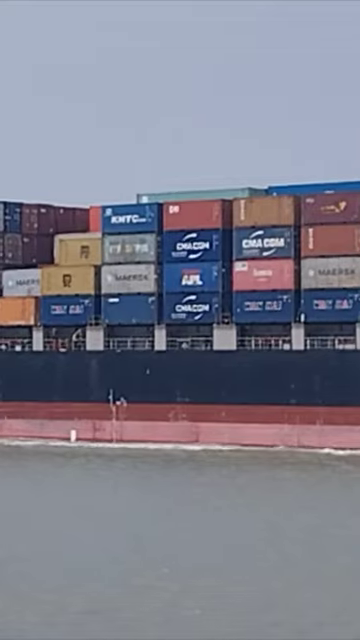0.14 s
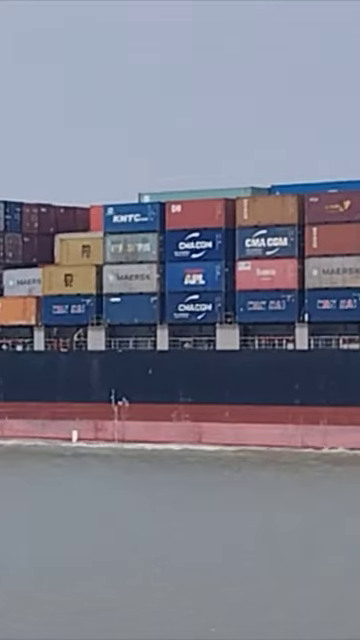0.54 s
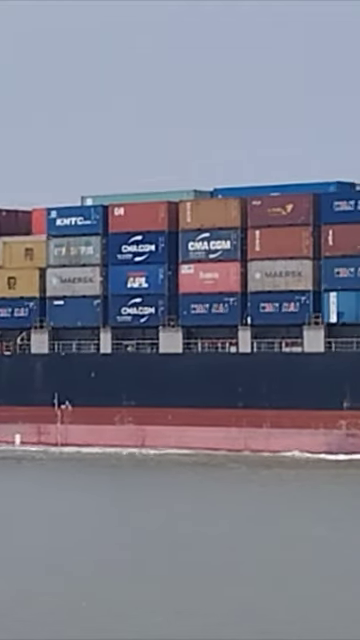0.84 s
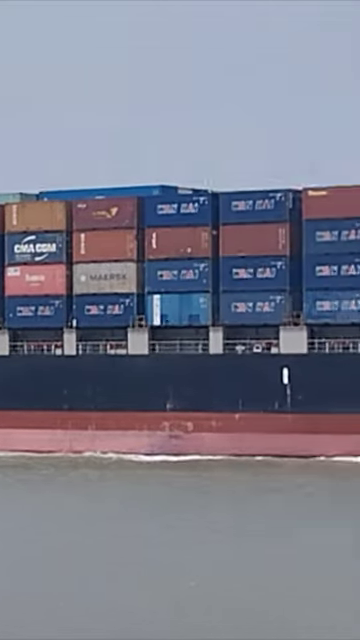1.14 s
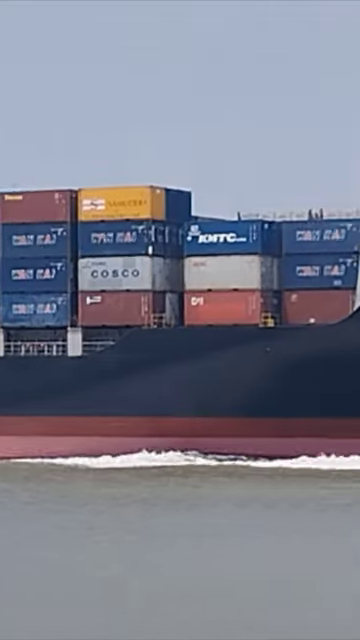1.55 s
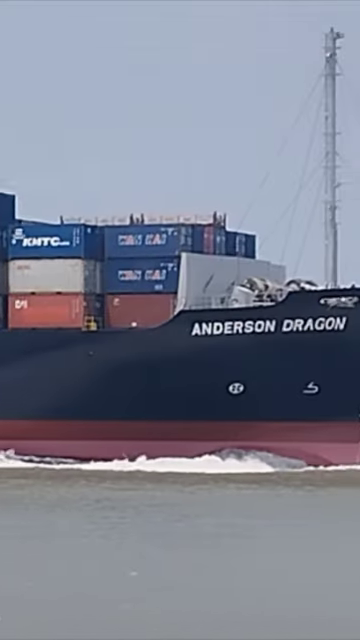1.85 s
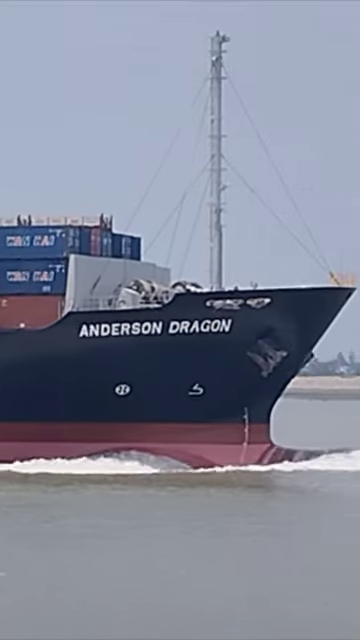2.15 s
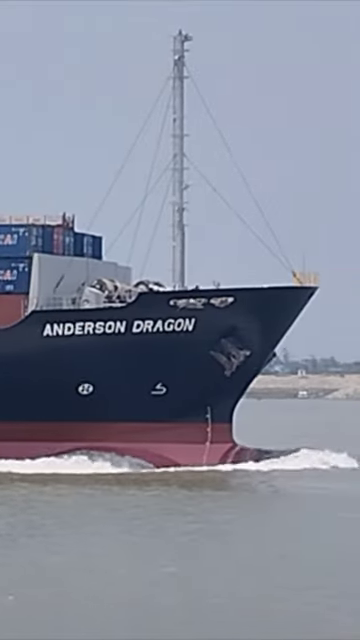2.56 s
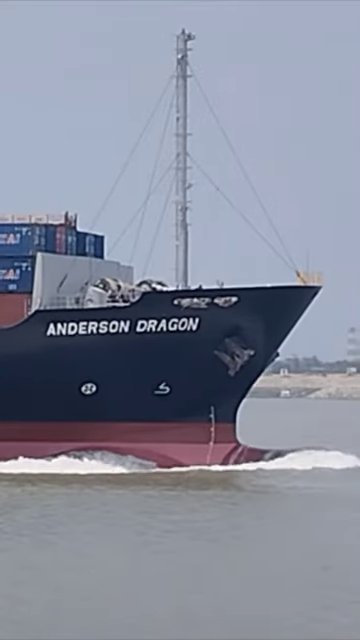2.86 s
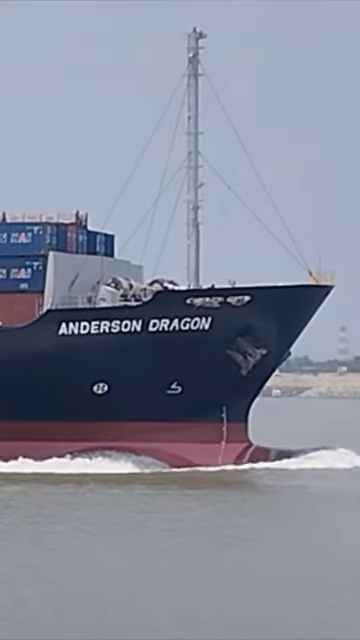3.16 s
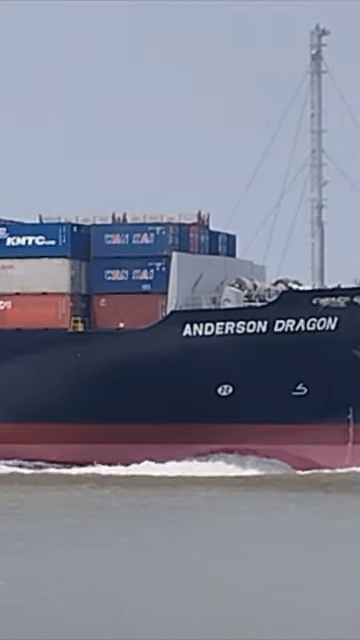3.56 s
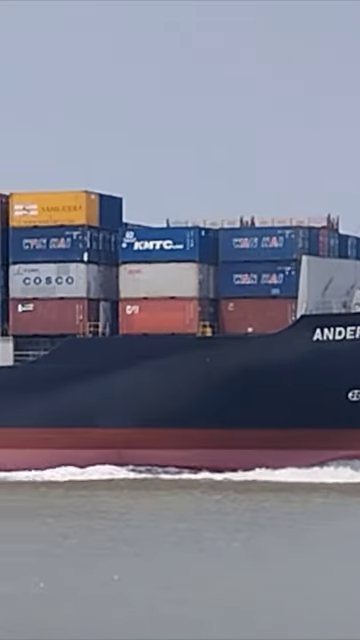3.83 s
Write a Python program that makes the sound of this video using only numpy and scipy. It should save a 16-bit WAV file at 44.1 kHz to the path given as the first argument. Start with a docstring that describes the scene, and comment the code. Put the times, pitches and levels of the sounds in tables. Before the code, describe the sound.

A cargo ship's air horn, loud, low and brassy, enters abruptly at about 0.7 seconds and holds one steady pitch until the cut at about 4 seconds, its upper tones shimmering and fading, with rough buzz and rushing air. Before it, after a tiny silence, a quieter fast diesel throb, wavering hum and water wash. Soft wind gusts buffet the handheld stereo microphones throughout.

```python
"""A diesel throb, a wavering hum, the wash of water and gusts on the two microphone ports come first:
a windy deck with a hand-held camera. Then a cargo ship sounds its air horn across open water.
The horn is a steady stack of partials that swell and fade as the air paths drift, with a rush of air.
Exhaust tones and hum are sinusoids; wash, wind and rush are shaped noise."""
import sys
import numpy as np
from scipy import signal
from scipy.io import wavfile
from scipy.ndimage import uniform_filter1d, minimum_filter1d

SR = 44100
rng = np.random.default_rng(int(sys.argv[2]) if len(sys.argv) > 2 else 0)


def wav_out(sig):
    """Save sig, one row per channel (or a flat mono array), as 16-bit PCM at SR to the path in sys.argv[1]."""
    wavfile.write(sys.argv[1], SR, np.round(np.clip(np.atleast_2d(sig).T, -1, 1) * 32767).astype(np.int16))


def decibels_to_gain(level_db):
    """Convert a level in decibels to a linear amplitude gain (20 dB per decade)."""
    exponent = np.asarray(level_db, float) / 20
    return 10 ** exponent


N = 176400

HORN_START_S, HORN_RISE_S = .702, .016
FILL_S = .8  # time in which the scattered sound builds up after the horn starts
PITCH_HZ = 194.36
CONTROL_STEP = 100  # samples between points of the slow horn controls
SIDE = np.array([[.5], [-.5]])  # shares a left-right difference between the ports

# balance of the horn between the two ports: f/Hz, left minus right/dB
HORN_BALANCE = [(190, -1.5), (390, 1.2), (600, -.5), (1000, -1.5), (1500, -3), (2500, -7), (4000, -7),
                (7000, -5), (9000, -2)]


def evened(x):
    """Scales a signal to an rms of one."""
    return x / np.sqrt(np.mean(abs(x) ** 2) + 1e-20)


def read(points, hz):
    """Reads a curve of (frequency, value) points along a logarithmic frequency axis."""
    f, value = np.transpose(points)
    return np.interp(np.log(hz + 1), np.log(f + 1), value)


def slow(rate_hz, t, channels):
    """Slow complex chance, rms 1: twelve random-phase rotations, rate_hz being the spread of their speeds."""
    f = rate_hz * rng.standard_normal((channels, 12, 1))
    start_turns = rng.random((channels, 12, 1))
    return np.exp(2j * np.pi * (f * t + start_turns)).sum(1) / np.sqrt(12)


def noise(shape, same, pan, patchy_db, lift_db, size):
    """Stereo noise from random short-time spectra with drifting patches; lift_db moves the level in time."""
    hop = size // 4
    frames, hz = N // hop + 5, np.fft.rfftfreq(size, 1 / SR)
    a, b, c, d, patches = rng.standard_normal((frames, len(hz), 5)).T
    patches = uniform_filter1d(patches, size=16, axis=0)  # across frequency
    patches = evened(uniform_filter1d(patches, size=10, axis=1))  # along time
    same = np.clip(read(same, hz), -1, 1)[:, None]
    left = a + 1j * b
    right = same * left + np.sqrt(1 - same ** 2) * (c + 1j * d)
    balance_db = np.outer([.5, -.5], read(pan, hz))[:, :, None]
    spectra = np.array([left, right]) * decibels_to_gain(read(shape, hz)[:, None] + patchy_db * patches + balance_db)
    sound = signal.istft(spectra, nperseg=size, noverlap=size - hop)[1][:, :N]
    return evened(sound) * decibels_to_gain(lift_db)


def engine(t):
    """Exhaust tones on the firing rate, a wavering hum, and a water and engine roar lifted by each firing."""
    # exhaust tones: multiple of the firing rate, level/dB rms
    exhaust = [(2, -54.5), (4, -44), (5, -52), (6, -52.5), (7, -39), (8, -55.5), (9, -43.5), (10, -51.5),
               (11, -46.5), (13, -47)]
    # water and distant engine roar: f/Hz, relative level per Hz/dB
    wash_shape = [(12, -49), (20, -13.5), (48, -12), (139, -19), (197, -19), (293, -25.5), (426, -30),
                  (735, -32.5), (943, -40.5), (2040, -44), (7610, -67), (9890, -103), (16700, -120)]
    # likeness of the roar in the two ports: f/Hz, likeness/0-1
    wash_same = [(60, 0.73), (120, 0.96), (240, 1), (470, 0.93), (920, 0.31), (1830, 0.11), (3620, 0.63),
                 (7160, 0.59)]
    # balance of the roar: f/Hz, left minus right/dB
    wash_balance = [(60, 4), (160, 5), (410, -0.5), (1060, 1), (2750, -4), (7160, -11)]
    firing_hz, wash_db = 10, -30
    hum_hz, hum_db, hum_waver_db = 43.6, -30.5, -2
    chuff_db, chuff_sharp, chuff_turn = 2, 9, 0.18  # lift, narrowness and place within one firing turn

    turns = firing_hz * t + 0.0088 * slow(0.63, t, channels=1).real[0]
    tones = sum(decibels_to_gain(db) * np.cos(2 * np.pi * (k * turns + rng.random())) for k, db in exhaust)
    waver = slow(1.8, t, channels=1)[0]
    hum = decibels_to_gain(hum_db + hum_waver_db * waver.real) * np.cos(2 * np.pi * hum_hz * t + .4 * waver.imag)
    lift_db = chuff_db * np.exp(chuff_sharp * (np.cos(2 * np.pi * (turns - chuff_turn)) - 1))
    roar = noise(wash_shape, wash_same, wash_balance, patchy_db=1.5, lift_db=wash_db + lift_db, size=2048)
    return np.sqrt(2) * (tones + hum) + roar


def wind(t):
    """Lumpy low pressure, drawn separately for the two ports, rising in gusts."""
    # wind at the ports: f/Hz, relative level per Hz/dB
    wind_shape = [(15, 4), (30, 0.5), (50, 8), (100, 3.5), (160, 10.5), (250, -0.5), (400, -23), (800, -48)]
    # gusts: t/s, length/s, level over the breeze/dB, left minus right/dB
    gusts = [(.6, .03, 6, 2), (.85, .08, 5, 3), (1.3, .05, 7, 8), (1.48, .06, 9, 8), (1.68, .05, 6, 4),
             (2.15, .06, 4, 6), (2.5, .07, 9, 2), (2.98, .05, 11, -8), (3.28, .05, 6, -4),
             (3.85, .06, 3, 0)]
    breeze_db = -38
    flat_zero = [(20, 0), (800, 0)]  # neither likeness nor imbalance at any frequency

    lift_db = breeze_db + 2.5 * slow(8, t, channels=2).real
    for s, length, db, balance_db in gusts:
        lift_db = lift_db + (db + SIDE * balance_db) * np.exp(-.5 * ((t - s) / length) ** 2)
    return noise(wind_shape, flat_zero, flat_zero, patchy_db=3, lift_db=lift_db, size=2048)


def scatter_fill(t):
    """Scattered sound builds up exponentially, 0 to 1, once the horn has started."""
    return 1 - np.exp(-np.maximum(t - HORN_START_S, 0) / FILL_S)


def partial_levels(k, t):
    """Source level of partial k, and the lift or dip in dB where its air paths add and cancel."""
    # horn: t/s, level of partials one to five/dB rms (five columns), offset of the upper partials
    # at the low and at the high end of the lean/dB (two columns), offset of the half-pitch partials/dB
    horn_course = [(0.729, -17, -14, -14.5, -22, -35.5, -35, -33.5, -16),
                   (0.84, -19.5, -11.5, -16, -26, -33, -33, -33, -12),
                   (0.99, -16, -11, -16.5, -22.5, -26, -28, -32.5, -16.5),
                   (1.29, -16.5, -12, -16, -22, -26, -33.5, -32, -15.5),
                   (1.57, -16.5, -10.5, -16.5, -22.5, -25, -29.5, -34.5, -18),
                   (1.949, -14, -12.5, -10, -21.5, -27.5, -28, -31.5, -10),
                   (2.15, -15, -12.5, -10.5, -22, -27, -30.5, -29, -13.5),
                   (2.3, -15, -14.5, -12, -27.5, -31.5, -26.5, -31.5, -10),
                   (2.52, -13, -16.5, -13.5, -27.5, -27.5, -32.5, -27.5, -12.5),
                   (2.54, -14, -13, -13, -41, -25, -26.5, -29.5, -8.5),
                   (2.659, -15.5, -17, -17.5, -27, -23, -32, -29, -13),
                   (2.89, -12.5, -14.5, -20.5, -26, -27.5, -38, -29, -11),
                   (3.251, -15.5, -14, -17.5, -20.5, -24, -33, -31, -12.5),
                   (3.412, -14.5, -15.5, -16, -23, -28.5, -30, -32, -10.5),
                   (3.6, -16.5, -12, -19, -22.5, -29, -33, -30, -9.5),
                   (3.78, -14, -12, -18.5, -32, -29.5, -39, -25, -15.5),
                   (3.97, -16, -11, -16.5, -27.5, -32, -40, -29, -12)]
    # partials six to eight as the air paths add and cancel: t/s, level of each/dB rms (three columns)
    brass_course = [(0.74, -29.5, -35.5, -32), (0.92, -31.5, -32.5, -29.5), (1.09, -37, -31, -30.5),
                    (1.42, -26.5, -32.5, -32.5), (1.64, -43, -33.5, -31.5), (1.79, -30, -44.5, -46),
                    (1.94, -28, -35, -47), (2.08, -25.5, -35, -35), (2.38, -31, -33, -43),
                    (2.53, -27.5, -34.5, -54), (2.76, -41, -35, -49), (2.91, -30, -33.5, -55),
                    (2.95, -29, -33.5, -39), (3.08, -41.5, -34, -42), (3.37, -39, -39.5, -47),
                    (3.55, -56, -41, -46), (3.61, -32, -36, -48), (3.73, -36.5, -46, -49),
                    (3.83, -31.5, -39, -46), (3.97, -34, -40.5, -42)]
    # bright spot wandering over the upper partials: t/s, centre f/Hz, lift/dB
    bright_spot = [(0.729, 2530, 4), (.8, 2460, -6), (1, 1950, 3.5), (1.35, 2004, 10), (1.7, 2200, 7),
                   (2.2, 2360, 9.5), (2.35, 2460, -1.5), (2.5, 2760, -4), (2.8, 2700, 8.5),
                   (3.1, 2600, -0.5), (3.4, 2530, 6.5), (3.7, 2610, 11.5), (3.971, 2690, 2)]
    # upper partials: f/Hz, relative level/dB
    bell = [(1170, 0), (1360, 1), (1560, -1.5), (1750, -13), (1940, -7.5), (2330, -13.5), (2720, -10.5),
            (3300, -20), (4500, -22), (5700, -25.5), (7000, -30.5), (7800, -41.5), (9700, -65)]
    # half-pitch partials: f/Hz, relative level/dB
    half_shape = [(97, -44), (290, -29.5), (490, -30.5), (680, -24.5), (880, -36), (1070, -34), (1260, -30),
                  (2000, -39.5), (3300, -44), (5700, -43.5), (7000, -52.5), (7800, -73), (9700, -93.5)]
    # extra edge of the fresh blast, fading as the scatter fills: f/Hz, lift/dB
    fresh_edge = [(3000, 0), (3900, 3.5), (4800, 4), (7000, 2.5)]
    lean_hz = (1600, 1900)  # as the camera turns, the weight shifts across this span
    bright_width_hz, half_late_db = 98, 8  # the half-pitch partials grow in after the start

    hz = k * PITCH_HZ
    s, *strong, low, high, half = np.transpose(horn_course)
    if k % 1:
        level_db = half + read(half_shape, hz) - half_late_db * np.exp(-(s - HORN_START_S) / FILL_S)
    elif k <= len(strong):
        level_db = strong[int(k) - 1]
    else:
        level_db = low + (high - low) * np.interp(hz, lean_hz, (0, 1)) + read(bell, hz)
    level_db = np.interp(t, s, level_db) + read(fresh_edge, hz) * (1 - scatter_fill(t))

    if k in (6, 7, 8):
        at, *brass = np.transpose(brass_course)
        meet_db = np.interp(t, at, brass[int(k) - 6]) - level_db
    else:
        when, spot_hz, spot_db = np.transpose(bright_spot)
        distance = (hz - np.interp(t, when, spot_hz)) / bright_width_hz
        meet_db = np.interp(t, when, spot_db) * np.exp(-.5 * distance ** 2)
    return level_db, meet_db


def air_path(k, t, meet_db):
    """Partial k at the two ports: a direct wave, a drifting scattered share and a faint blurred echo."""
    # drifting share against the direct path: f/Hz, ratio
    scatter = [(190, .08), (600, 0.14), (1000, 0.65), (1200, .62), (1700, .7), (2000, 1.1), (4000, 1.4)]
    # part of the drift alike in both ports, the rest opposed: f/Hz, share/0-1
    drift_same = [(190, .05), (1000, .05), (1600, .1), (1800, .6), (4000, .6), (5000, .8), (8000, .95)]
    # faint blurred echo: f/Hz, ratio
    echo_ratio = [(190, .02), (600, .02), (1200, .1), (2000, .12), (3500, .13), (8000, .13)]
    # lead of the left port: f/Hz, phase/rad
    port_lead = [(190, -0.069), (390, 0.26), (600, 0.35), (800, 0.026), (1000, -0.86), (8000, -0.82)]
    drift_hz, drift_per_khz = 0.557, .6  # spread of fading speeds/Hz, and its growth per kHz of pitch
    first_share = .5  # the alike drift starts from this part of its full size
    spread_rad, offset_rad = 1.45, -.92  # to the fourth partial, phase grows with its number squared
    step_rad, smear_rad = -.07, .12  # the next stay in step as one pulse; above the tenth they smear
    wander_rad = 1.2  # phase drift for each unit of the drifting share
    echo_sharp, flutter_hz = .0125, 4  # echo this share above the pitch, as from a moving source

    hz, filled = k * PITCH_HZ, scatter_fill(t)
    ratio, same = read(scatter, hz), np.clip(read(drift_same, hz), 0, 1)
    both, opposed = slow(drift_hz + drift_per_khz * hz / 1000, t, channels=2)
    alike = np.maximum(filled, first_share) * ratio * same
    direct = decibels_to_gain(meet_db) * (1 + alike * both)
    apart = 2 * SIDE * ratio * np.sqrt(filled * (1 - same ** 2)) * opposed
    path = (direct + apart) / np.sqrt(1 + alike ** 2)

    chance = rng.standard_normal((2, len(t), 2)) @ [1, 1j]
    pole = np.exp(-2 * np.pi * flutter_hz * CONTROL_STEP / SR)
    flutter = evened(signal.lfilter([1], [1, -pole], chance))
    path = path + filled * read(echo_ratio, hz) * flutter * np.exp(2j * np.pi * echo_sharp * hz * t)

    phase = spread_rad * min(k, 4) ** 2 + offset_rad
    phase = phase + step_rad * max(k - 4, 0) + smear_rad * max(k - 10, 0) ** 2
    phase = phase + wander_rad * filled * ratio * both.imag
    return path * decibels_to_gain(SIDE * read(HORN_BALANCE, hz)) * np.exp(1j * (SIDE * read(port_lead, hz) + phase))


def horn_rush(t, turns):
    """Air rushing through the horn: noise that beats at the pitch and builds up after the start."""
    # rush of air: f/Hz, relative level per Hz/dB
    air_shape = [(150, -17), (400, -6), (800, -11.5), (1300, -15.5), (2500, -14.5), (4500, -22.5),
                 (6000, -21.5), (7500, -45.5), (8500, -55.5), (10000, -44.5)]
    # likeness of the rush in the two ports: f/Hz, likeness/0-1
    air_same = [(190, 0.62), (800, 1), (1500, 0.079), (4000, 0.15), (5000, 0.82), (8000, 0.63)]
    air_db, beat_depth = -37.5, 0.48
    late_db, first_db, first_s = 4, 6, .1  # starts quieter, builds fastest at first

    lift_db = air_db - late_db * (1 - scatter_fill(t[::CONTROL_STEP]))
    lift_db = np.interp(t, t[::CONTROL_STEP], lift_db)
    lift_db = lift_db - first_db * np.exp(-abs(t - HORN_START_S) / first_s)
    rush = noise(air_shape, air_same, HORN_BALANCE, patchy_db=2, lift_db=lift_db, size=1024)
    on = np.clip((t - HORN_START_S) / HORN_RISE_S, 0, 1)
    return rush * on * (1 + beat_depth * np.cos(2 * np.pi * turns))


def horn(t):
    """A stack of partials; half-pitch ones arise as every second stroke of the diaphragm differs a little."""
    sharp_hz, settle_s = 4.5, .05  # starts sharp, settles
    treble_lag_s = .006  # higher partials speak later

    bend_hz = sharp_hz * np.exp(-np.maximum(t - HORN_START_S, 0) / settle_s)
    turns = np.cumsum(PITCH_HZ + bend_hz) / SR
    coarse, out = t[::CONTROL_STEP], np.zeros((2, N))
    spin, wave = np.exp(1j * np.pi * turns), np.ones(N, complex)
    for half_step in range(1, 100):
        k = half_step / 2  # multiple of the pitch
        wave = wave * spin
        level_db, meet_db = partial_levels(k, coarse)
        path = air_path(k, coarse, meet_db)
        speaks_s = HORN_START_S + treble_lag_s * np.log(k + 1) / 2
        rise = np.clip((coarse - speaks_s) / HORN_RISE_S, 0, 1)
        path = path * rise * decibels_to_gain(level_db) * np.sqrt(2)
        out += (np.array([np.interp(t, coarse, port) for port in path]) * wave).real
    return out + horn_rush(t, turns)


def scene():
    """Engine, wind and horn add up at the two microphone ports."""
    t = np.arange(N) / SR
    return engine(t) + wind(t) + horn(t)


def low_pass(x):
    """Removes everything above the highest recorded frequency."""
    return signal.sosfilt(signal.butter(12, 9700, fs=SR, output="sos"), x)


def record(dry):
    """The recorder opens, rounds the highest peaks softly and limits them."""
    open_s, open_rise_s = .09, .008  # silence until the recorder starts, then a short rise
    knee, ceiling, limit_s = 2.4, .88, .02  # soft knee, limiter ceiling and its time

    opened = dry * np.clip((np.arange(N) / SR - open_s) / open_rise_s, 0, 1)
    rounded = knee * np.tanh(opened / knee)
    span = round(limit_s * SR)
    allowed = ceiling / np.maximum(abs(rounded).max(0), ceiling)
    gain = uniform_filter1d(minimum_filter1d(allowed, size=2 * span), size=span)
    return low_pass(rounded * gain)


dry = scene()
out = record(dry)
wav_out(out)
```